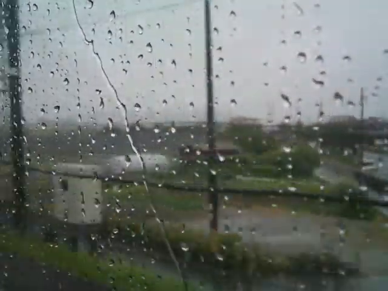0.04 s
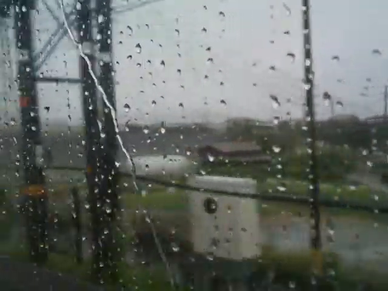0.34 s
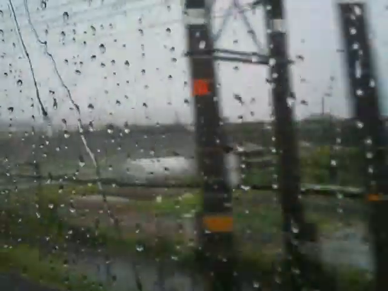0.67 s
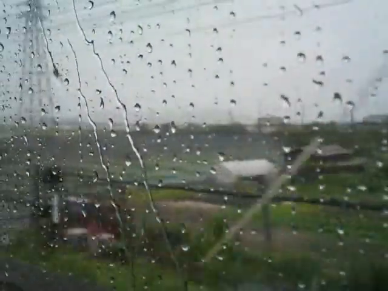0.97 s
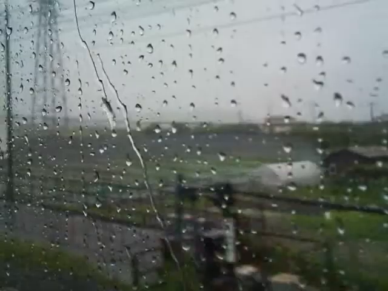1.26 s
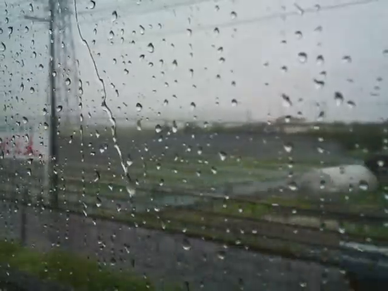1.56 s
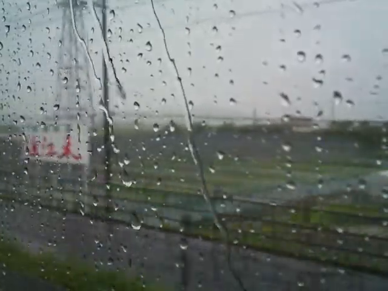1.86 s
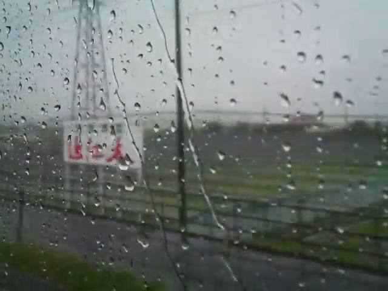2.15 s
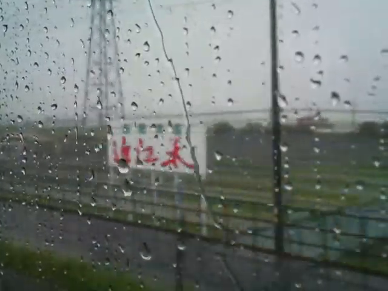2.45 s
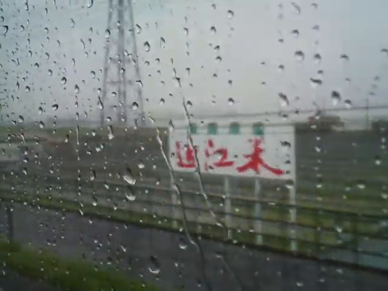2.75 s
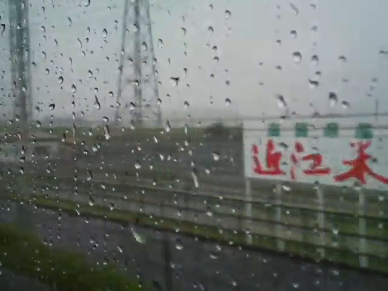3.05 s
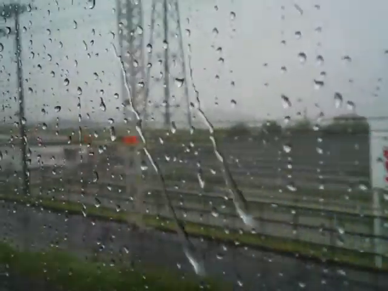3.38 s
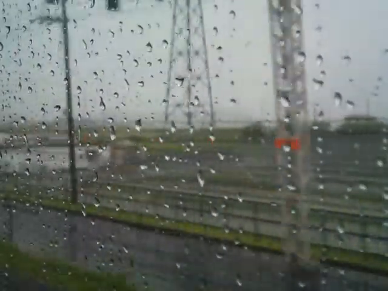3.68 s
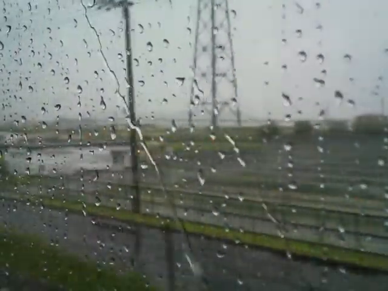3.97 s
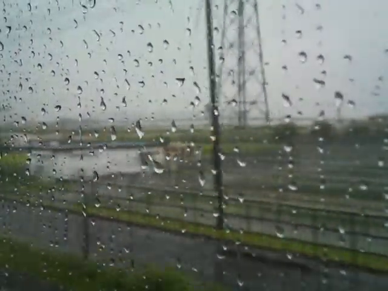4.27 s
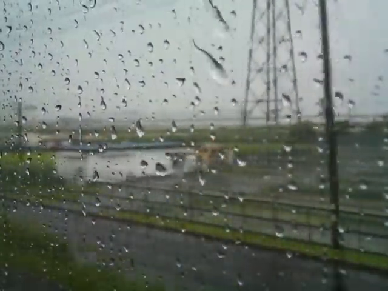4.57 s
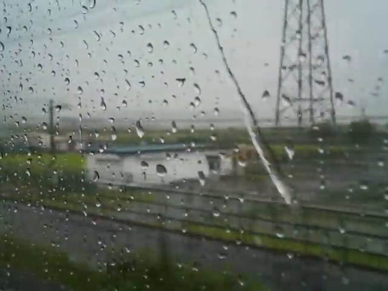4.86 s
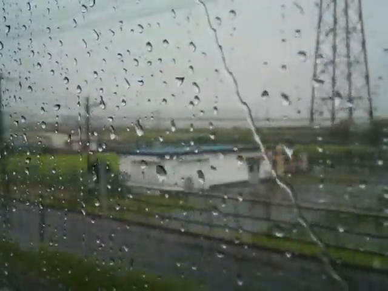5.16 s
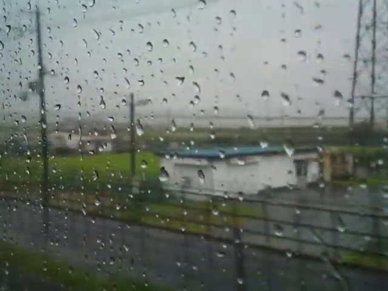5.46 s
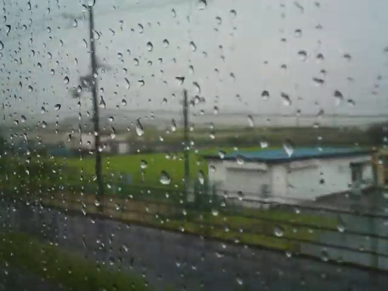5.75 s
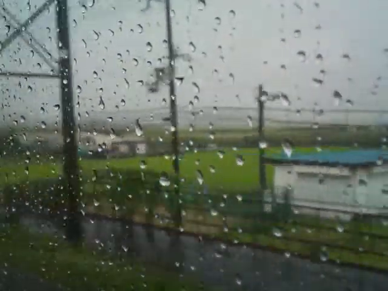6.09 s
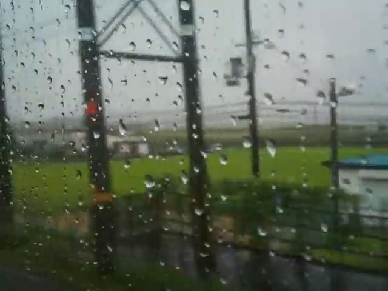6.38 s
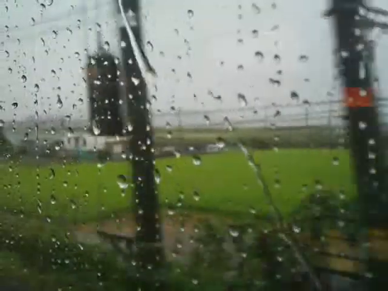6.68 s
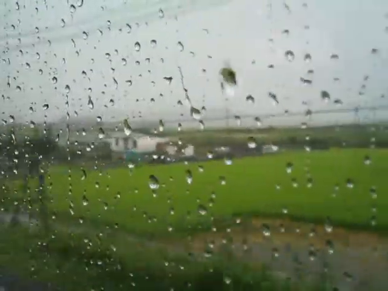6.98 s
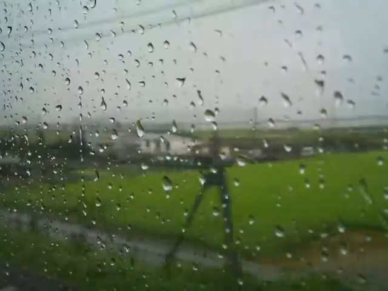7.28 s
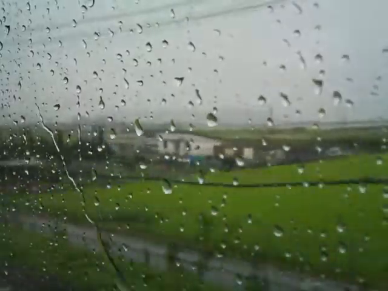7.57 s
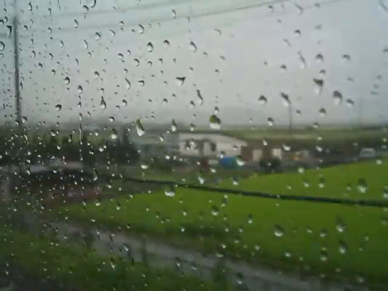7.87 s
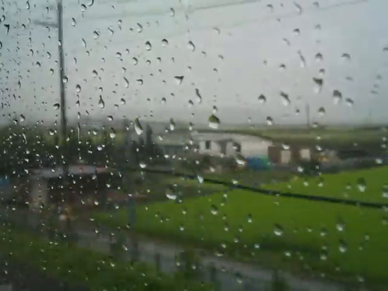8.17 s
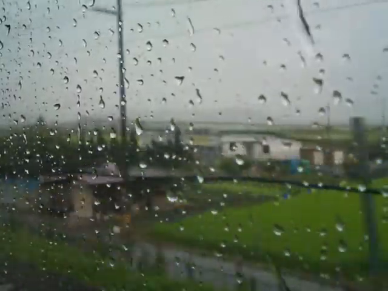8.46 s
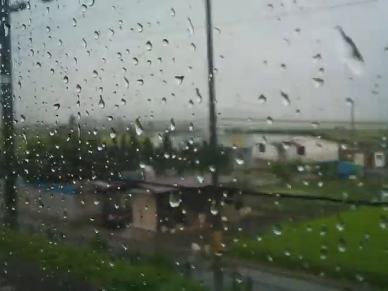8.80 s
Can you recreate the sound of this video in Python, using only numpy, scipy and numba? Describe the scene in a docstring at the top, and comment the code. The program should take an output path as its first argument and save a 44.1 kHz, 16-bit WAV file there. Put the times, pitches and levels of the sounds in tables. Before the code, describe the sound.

An electric train heard from its cabin: a slowly climbing motor whine, low body rumble, wheel noise and faint creaks from the trim.

```python
"""Inside an accelerating electric train

The traction drive hums and whines, climbing slowly in pitch, over the hum of the transformer and the
broadband boom of the car body and roar of wheels and air. Trim panels rub, fittings tick faintly and
two track bumps heave the floor. A fast gain control ducks everything whenever the rumble swells."""
import sys
import numpy as np
from scipy import signal
from scipy.fft import rfft, irfft, next_fast_len
from scipy.io import wavfile
from scipy.ndimage import map_coordinates
from numba import njit

SR = 44100
rng = np.random.default_rng(int(sys.argv[2]) if len(sys.argv) > 2 else 0)


def to_wav(sig):
    """Store sig (one row per channel, or 1-D mono) as 16-bit WAV at the path in sys.argv[1].

    Samples outside -1..1 are clipped; the rate is SR.
    """
    pcm = np.clip(np.atleast_2d(sig), -1, 1) * 32767
    pcm = np.round(pcm).astype(np.int16)
    wavfile.write(sys.argv[1], SR, pcm.T)  # frames by channels


N = 393813
t = np.arange(N) / SR


def amp(db):
    """Amplitude ratio of a level in decibels."""
    return 10 ** (np.asarray(db) / 20)


def unit(x):
    """Normalisation to rms 1."""
    return x / np.sqrt(np.mean(x ** 2) + 1e-20)


def curves(rows):
    """Linear interpolation in time: one curve for each column after the first."""
    times, *columns = np.transpose(rows)
    return [np.interp(t, times, column) for column in columns]


def wobble(rate):
    """Smooth random modulation: a spline through rate Gaussian values a second."""
    return map_coordinates(rng.standard_normal(4096), [t * rate + 2], mode="wrap")


def filtered(x, response):
    """Linear filtering: the spectrum of x times a frequency response."""
    size = next_fast_len(N + 8192)
    return irfft(rfft(x, size) * response(np.fft.rfftfreq(size, 1 / SR)), size)[:N]


def noise(spectrum):
    """Spectral shaping of white noise by (f/Hz, relative level/dB) rows, scaled to rms 1."""
    f, db = np.transpose(spectrum)
    response = lambda hz: amp(np.interp(np.log(hz + 1), np.log(f), db))
    return unit(filtered(rng.standard_normal(N), response))


def tone(hz, waver_db=0, waver_rate=1):
    """Phase is the integral of frequency; vibration modulates the amplitude of a sine of rms 1."""
    phase = 2 * np.pi * (np.cumsum(hz * np.ones(N)) / SR + rng.random())
    return np.sqrt(2) * np.sin(phase) * amp(waver_db * wobble(waver_rate))


def bell(centre, half_width):
    """Gaussian envelope, down to 1/e one half-width from its centre."""
    return np.exp(-((t - centre) / half_width) ** 2)


def swells(rows):
    """Level change in dB: a sum of Gaussian rises and dips."""
    return sum(db * bell(centre, half_width) for centre, half_width, db in rows)


def pulses(rows):
    """Amplitude envelope: a sum of Gaussian pulses with peak levels given in dB."""
    return sum(amp(db) * bell(centre, half_width) for centre, half_width, db in rows)


# Pitch of the drive: t/s, hum f/Hz, second tone f/Hz
DRIVE_PITCH = [(0, 221.9, 603.3), (1, 225.5, 612.4), (2.05, 229.0, 623.0), (2.9, 228.4, 630.0),
               (3.8, 229.0, 635.5), (5, 230.6, 641.6), (6, 232.3, 646.2), (7, 233.7, 651.0),
               (8, 235.4, 655.2), (8.93, 236.7, 659.1)]
# Strength of the hum, nearly constant: t/s, level/dB
HUM_LEVEL = [(0, -24), (.5, -21.5), (.85, -24.5), (1.55, -21), (3.6, -23), (4.2, -21), (7.1, -24),
             (8.93, -22.5)]
# Whine and second tone swell and fade on climbing through cabin resonances: t/s, level/dB
WHINE_LEVEL = [(0, -24), (.4, -23.5), (.77, -21), (1.79, -23.5), (3.1, -23.5), (4.2, -26.5), (4.8, -30.5),
               (5.6, -32.5), (6.7, -24), (7.7, -26), (8.55, -36), (8.93, -30.5)]
SECOND_LEVEL = [(0, -41), (1.3, -38.5), (2.5, -31.5), (4.2, -30.5), (5.6, -26), (6.6, -27), (7.9, -34),
                (8.93, -32)]
# Weak orders, fading likewise: multiple of the hum pitch, relative level/dB at start, middle and end
WEAK_ORDERS = [(.836, -39, -34, -39), (1.882, -68, -52, -44), (2, -55, -45, -44), (2.476, -48, -52, -62),
               (3.3333, -47, -44, -56), (4, -56, -48, -48), (6, -66, -70, -74)]

def traction_drive():
    """Shaft orders keep fixed frequency ratios; an independent second tone beats with the whine."""
    hum_hz, second_hz = curves(DRIVE_PITCH)
    hum = amp(curves(HUM_LEVEL)[0]) * tone(hum_hz, waver_db=0.5, waver_rate=14)
    whine = amp(curves(WHINE_LEVEL)[0]) * tone(3 * hum_hz, waver_db=1, waver_rate=16)
    second = amp(curves(SECOND_LEVEL)[0]) * tone(second_hz)
    orders = np.zeros(N)
    for multiple, *levels in WEAK_ORDERS:
        level_db = np.interp(t, np.linspace(0, N / SR, len(levels)), levels)
        orders += amp(level_db) * tone(multiple * hum_hz, waver_db=3, waver_rate=2.2)
    return hum + whine + second + amp(-1.5) * orders


# Deep hum of the transformer: t/s, level/dB
TRANSFORMER_LEVEL = [(0, -40.5), (.65, -37), (1.2, -50), (3.2, -46.5), (4.3, -36.5), (5.1, -47),
                     (5.55, -36), (6.5, -33), (7.05, -47.5), (7.7, -37), (8.93, -36)]
# Steady whistles of the on-board electrics: f/Hz, level/dB
WHISTLES = [(1485, -61), (1801, -67)]

def electrics(mains_hz=60):
    """Forced vibration: the transformer hums at mains frequency and its octave, under thin whistles."""
    hum = amp(curves(TRANSFORMER_LEVEL)[0]) * tone(mains_hz, waver_db=2.5, waver_rate=4.8)
    octave = amp(-40.5 + 0.55 * t) * tone(2 * mains_hz, waver_db=2.5, waver_rate=3)
    whistles = sum(amp(db) * tone(hz, waver_db=1.5, waver_rate=9) for hz, db in WHISTLES)
    return hum + octave + whistles


# Spectral densities of body rumble, wheel roar and air hiss: f/Hz, relative level/dB
BODY_SPECTRUM = [(15, -27), (29, -12.5), (40, -14.5), (66, -8.5), (95, -8.5), (128, -1.5), (142, -3.5),
                 (172, -6), (191, 4), (208, -7), (250, -10.5), (300, -14), (380, -29.5), (700, -79.5)]
WHEEL_SPECTRUM = [(150, -9.5), (290, 13), (390, 5.5), (490, 8.5), (540, 6), (640, 11.5), (740, 9.5),
                  (830, 4.5), (930, 2), (980, -3), (1070, -8), (1190, -2), (1270, -17), (1700, -49)]
AIR_SPECTRUM = [(700, -17.5), (1250, 2), (1480, 4.5), (1600, -1.5), (1850, 1.5), (2150, -3.5), (2370, 0),
                (2620, -6), (3400, -2.5), (4600, -11), (5600, -11.5), (6850, -14.5), (7800, -31.5),
                (8800, -56.5)]
# Brief surges (+) and dips (-) of the roar and hiss: t/s, half-width/s, level change/dB
SURGES_AND_DIPS = [(.47, .11, 4.5), (.85, .1, -2), (4.38, .04, 3), (4.8, .13, 2), (5.31, 0.011, 5),
                   (7.5, .025, 3.5), (7.74, .025, 3.5), (7.86, .05, -4.5), (8.0, 0.071, 2),
                   (8.21, 0.032, 4.2), (8.65, 0.026, 4.5), (8.86, 0.051, 3.5)]
# Booms of the swaying car body: t/s, half-width/s, level rise/dB
BODY_BOOMS = [(1.8, .3, 3.5), (4.97, .1, 4.5), (7.8, .2, 2.5), (8.35, 0.16, 4)]

def running_noise():
    """Broadband noise grows with speed; the track's quick shaking modulates roar and hiss together."""
    surge_db = swells(SURGES_AND_DIPS)
    shake_db = 0.86 * wobble(rate=32)
    rumble = amp(-27 + 0.39 * t + 0.26 * surge_db + swells(BODY_BOOMS)) * noise(BODY_SPECTRUM)
    roar = amp(-35.5 + 0.56 * t + surge_db + shake_db) * noise(WHEEL_SPECTRUM)
    flicker_db = 0.92 * wobble(rate=60)
    hiss = amp(-53.5 + 0.5145 * t + surge_db + shake_db + flicker_db) * noise(AIR_SPECTRUM)
    return rumble + roar + hiss


# Squeaks and groans of the trim panels: t/s, half-width/s, f/Hz, resonator bandwidth/Hz, level/dB
PANEL_RUBS = [(0.233, .08, 3240, 450, -55), (0.483, .06, 2350, 350, -53), (0.498, .1, 427, 70, -39.5),
              (0.522, 0.083, 3180, 350, -57), (0.925, 0.052, 406, 59.6, -39),
              (1.837, 0.027, 3560, 280, -58.5), (2.491, .08, 1070, 220, -44),
              (4.693, 0.032, 3530, 301, -52), (5.237, 0.026, 3530, 250, -55),
              (5.952, 0.024, 3440, 452, -56), (6.42, 0.02, 3220, 326, -53.5),
              (7.194, .045, 3470, 260, -51.5), (7.352, 0.031, 1848, 230, -51),
              (7.477, 0.047, 413, 50.3, -36), (7.739, 0.021, 3420, 298, -50), (8.214, 0.045, 566, 60, -33)]

def trim_panels():
    """Friction excites resonance: each rub is a burst of noise passed twice through a narrow filter."""
    out = np.zeros(N)
    for centre, half_width, hz, bandwidth_hz, db in PANEL_RUBS:
        near = np.abs(t - centre) < 3 * half_width
        friction = rng.standard_normal(N)[near]
        resonator = signal.iirpeak(hz, hz / bandwidth_hz, SR)
        chafe = signal.lfilter(*resonator, signal.lfilter(*resonator, friction))
        out[near] += amp(db) * bell(centre, half_width)[near] * unit(chafe)
    return out


# Ticks of the fittings: t/s, half-width/s, level/dB
FITTING_TICKS = [(3.402, 0.0081, -42), (5.9357, .006, -40)]
# Spectral density of a tick: f/Hz, relative level/dB
TICK_SPECTRUM = [(900, -5), (2000, 2), (3400, 2), (4700, -3.5), (6300, -4.5), (7300, -12.5), (8500, -38)]

def fittings():
    """Short transients have broad spectra: each tick is a brief pulse of bright noise."""
    return pulses(FITTING_TICKS) * noise(TICK_SPECTRUM)


# Jolts from bumps in the track: t/s, half-width/s, level/dB
TRACK_JOLTS = [(4.851, 0.021, -29.5), (7.732, 0.012, -24.5)]

def floor_jolts(resonance_hz=56):
    """Impulse excitation: a bump heaves the floor for a few cycles of its lowest resonance."""
    return pulses(TRACK_JOLTS) * tone(resonance_hz, waver_db=0.5, waver_rate=19)


def scene():
    """Superposition of all sources at a window seat, in one channel."""
    return (traction_drive() + electrics() + running_noise() + trim_panels() + fittings()
            + floor_jolts())[None]


@njit
def peak_envelope(x, attack_samples, release_samples):
    """First-order smoothing of a rectified signal, with separate time constants for rise and fall."""
    level, out = 2 * np.mean(x), np.empty(len(x))
    for i in range(len(x)):
        level += (x[i] - level) / (attack_samples if x[i] > level else release_samples)
        out[i] = level
    return out


def gain_control(x, attack_s, release_s, strength):
    """Dynamic compression: peaks turn the gain down at once, and it recovers between them."""
    envelope = peak_envelope(np.abs(x), attack_s * SR, release_s * SR)
    return x * (np.median(envelope) / envelope) ** strength


def record(dry):
    """Compression evens the level; an ideal low-pass filter limits the bandwidth."""
    levelled = gain_control(dry[0], attack_s=0.00039, release_s=0.057, strength=0.97)
    return filtered(levelled, lambda hz: hz < 8400)[None]


dry = scene()
out = record(dry)
to_wav(out)
```